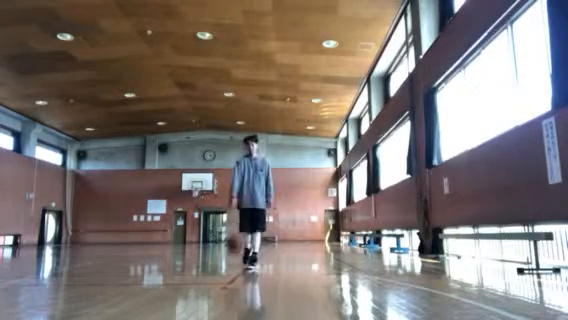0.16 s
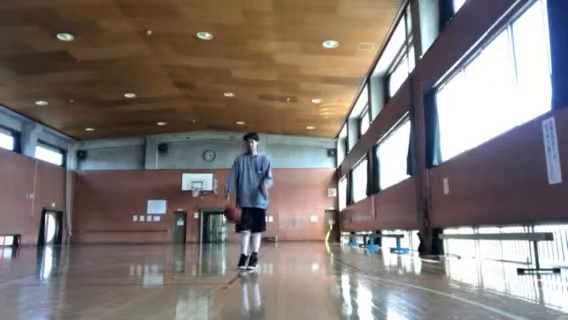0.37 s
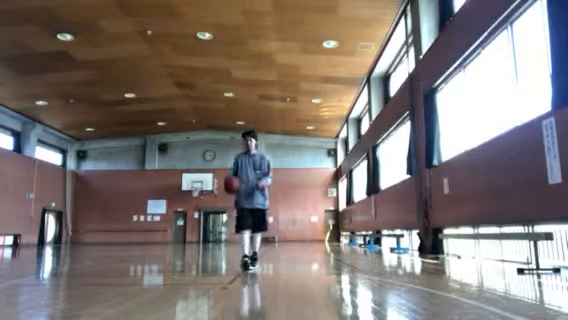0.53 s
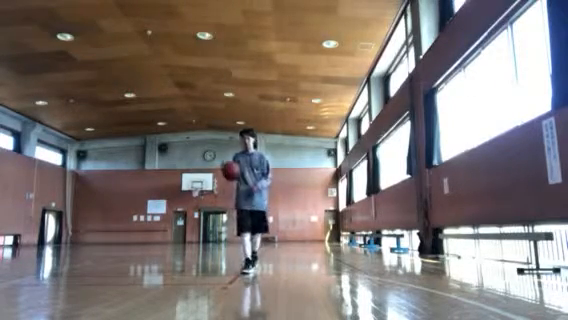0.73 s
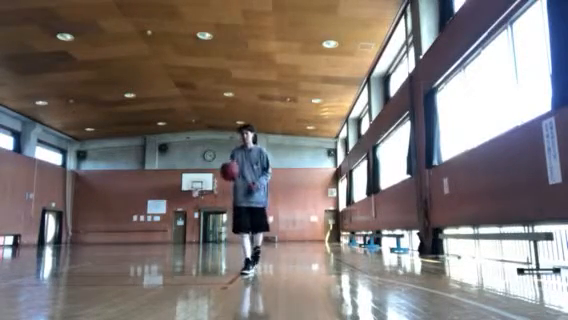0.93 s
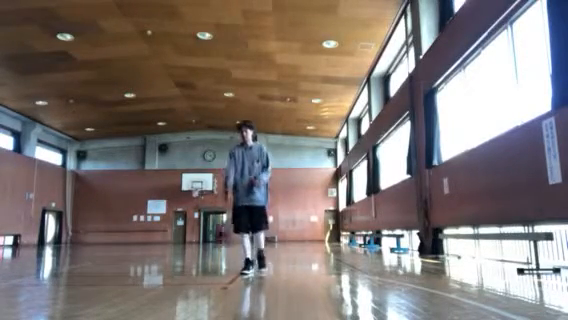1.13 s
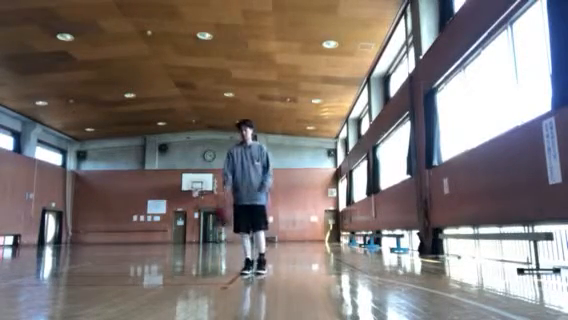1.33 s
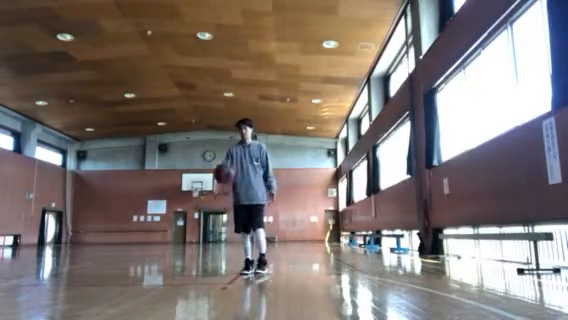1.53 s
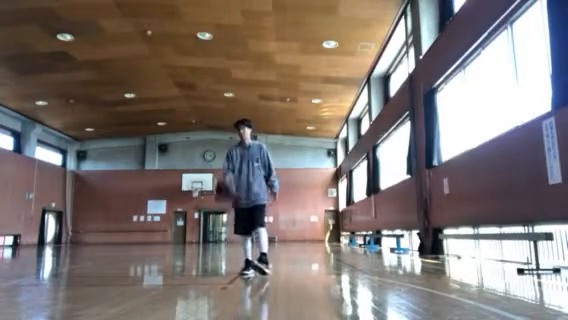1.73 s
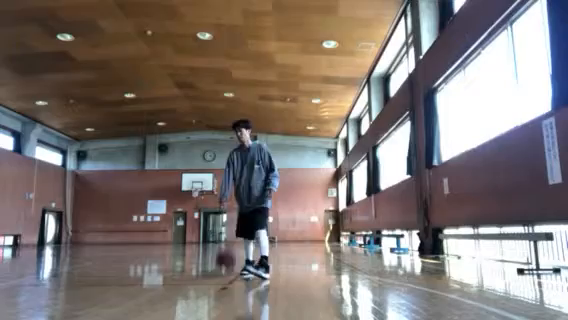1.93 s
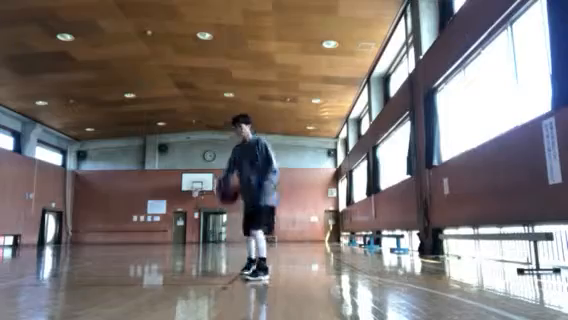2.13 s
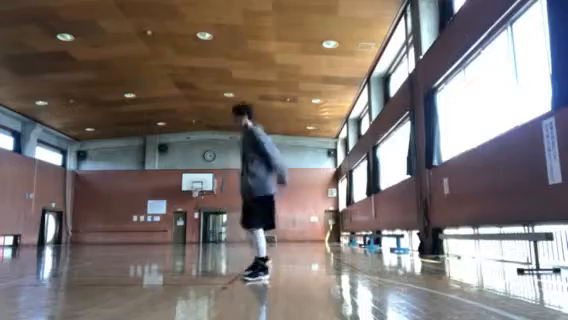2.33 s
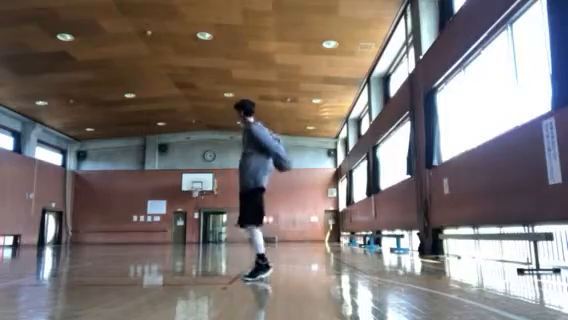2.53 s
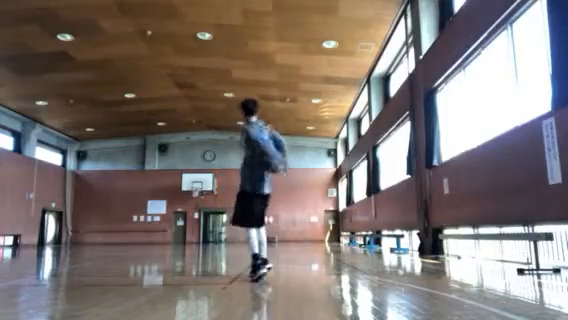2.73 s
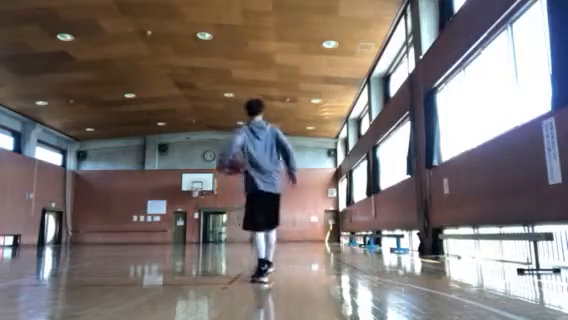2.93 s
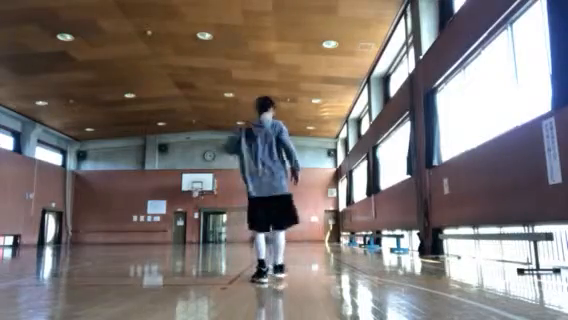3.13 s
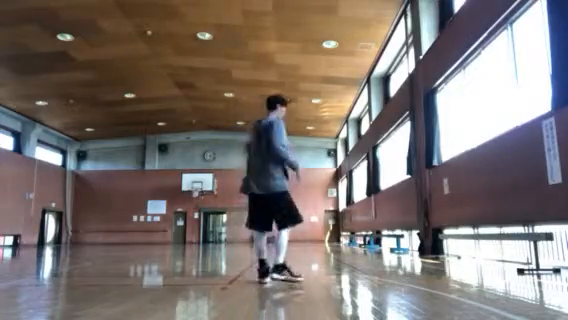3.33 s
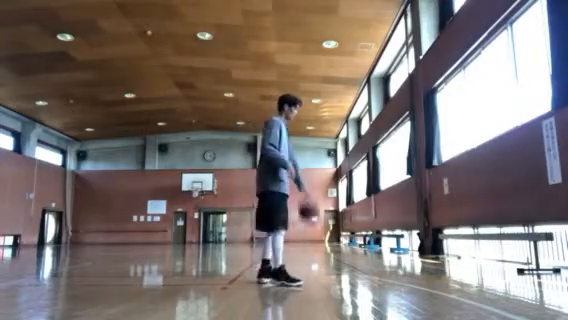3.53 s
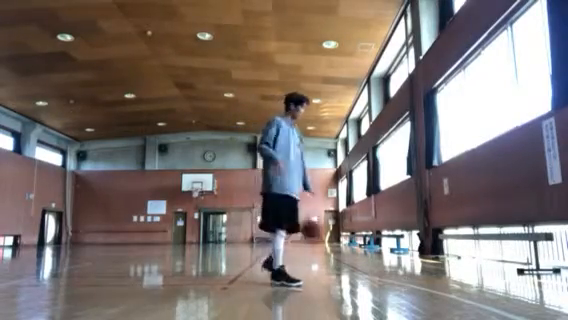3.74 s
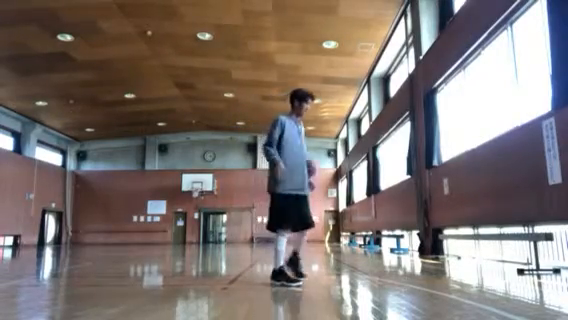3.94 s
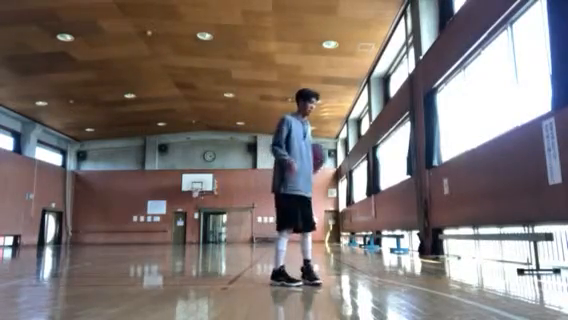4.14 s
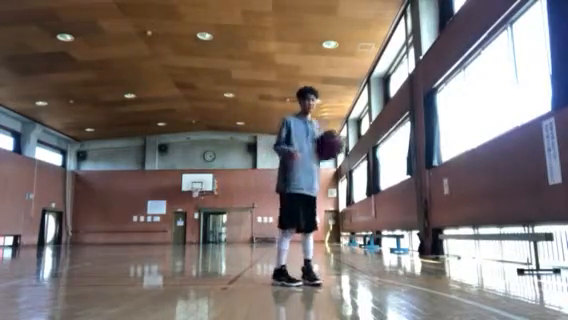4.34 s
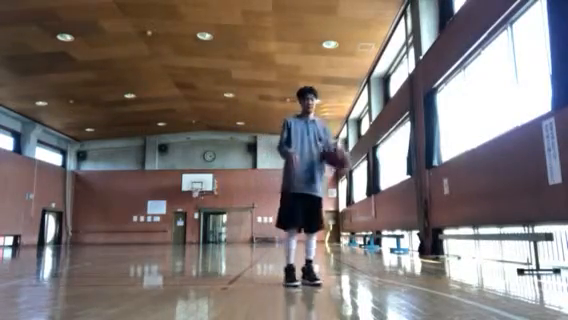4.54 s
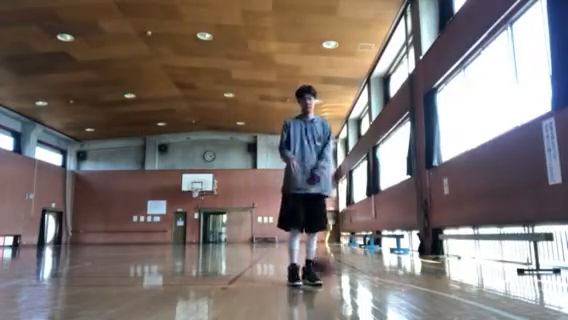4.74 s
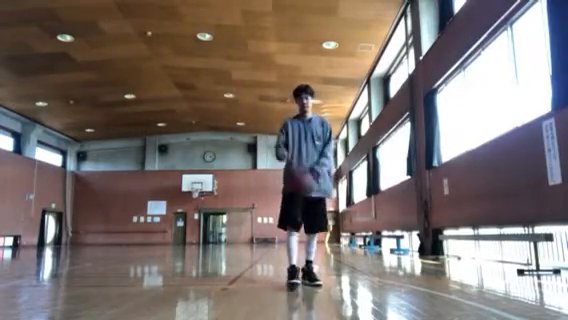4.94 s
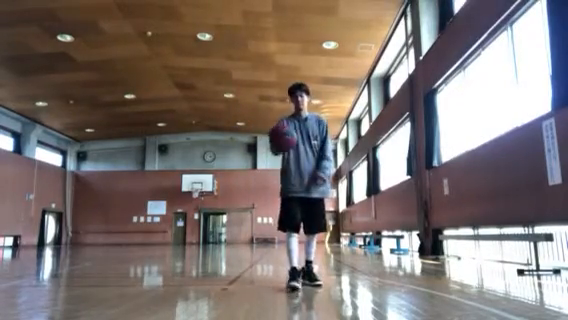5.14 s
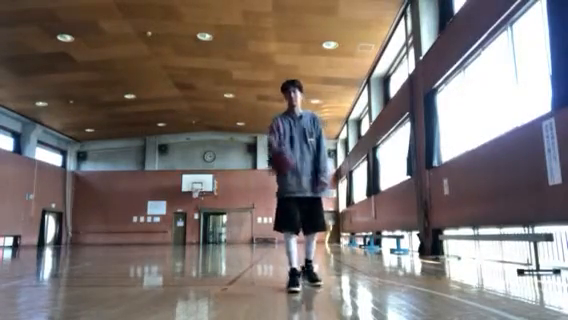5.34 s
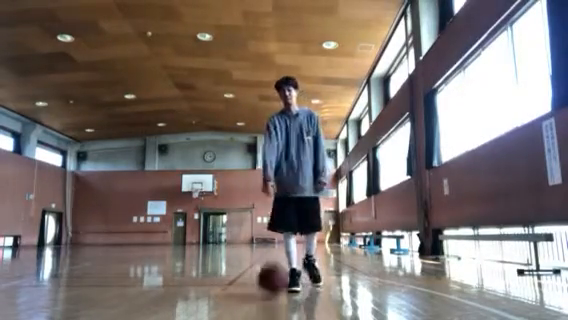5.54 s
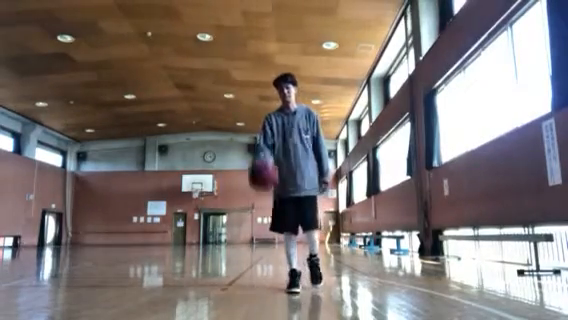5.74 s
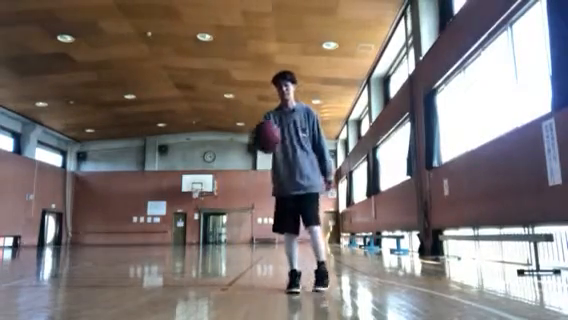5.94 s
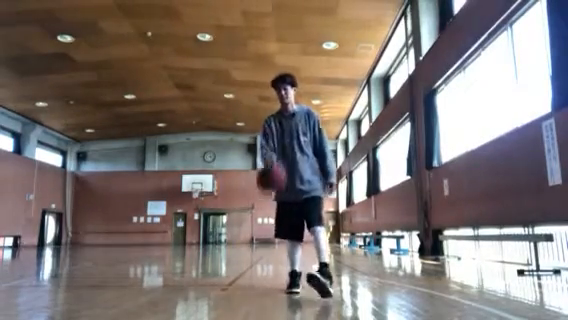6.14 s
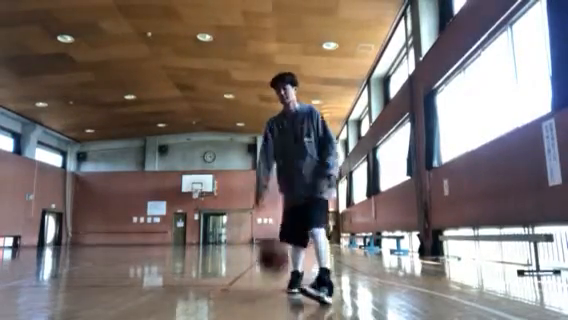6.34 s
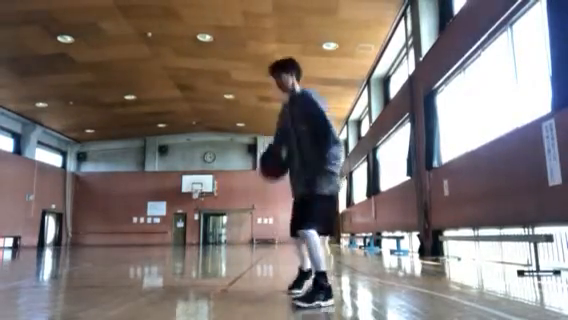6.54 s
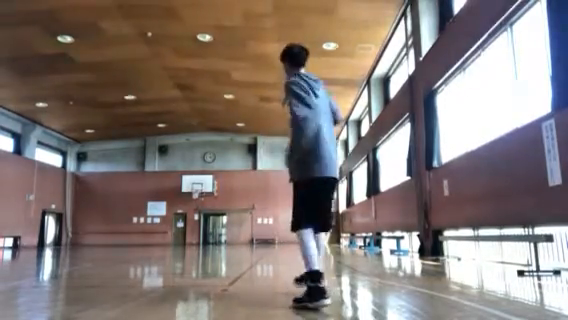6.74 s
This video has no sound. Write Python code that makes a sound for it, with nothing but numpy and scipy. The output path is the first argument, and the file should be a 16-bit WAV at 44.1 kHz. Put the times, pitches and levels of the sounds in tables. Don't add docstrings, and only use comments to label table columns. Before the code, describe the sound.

A basketball bounces seven times on a wooden floor in a large empty gym, each sharp smack booming and ringing out, with a brief shoe squeak.

```python
import sys
import numpy as np
from scipy import signal
from scipy.fft import rfft, irfft, next_fast_len
from scipy.io import wavfile
from scipy.ndimage import uniform_filter1d

SR = 44100
rng = np.random.default_rng(int(sys.argv[2]) if len(sys.argv) > 2 else 0)


def nominal_scale(level):
    x = np.asarray(level, float) / 20
    return 10 ** x


def unload_wav(signal):
    wavfile.write(
        sys.argv[1],
        SR,
        np.round(np.clip(np.atleast_2d(signal).T, -1, 1) * 32767).astype(np.int16),
    )


N = 298998
TIME = np.arange(N) / SR

# t/s, crack peak level/dB, brightness/dB, hall level/dB, floor level/dB
BOUNCES = [
    (0.353, -16, 0.5, -28.5, -30.5),
    (1.344, -15.5, -2, -30, -29),
    (2.056, -13, 8, -29, -32.5),
    (3.789, -12.5, 9, -28.5, -31),
    (4.891, -11.5, 8, -27, -27),
    (5.671, -9, 7.5, -28.5, -29.5),
    (6.433, -11.5, 7.5, -28.5, -26),
]
# t/s, hall level/dB
EARLIER_BOUNCE = (-0.26, -30)
# side wall delay/s, ceiling delay/s, bite of the skin/dB
SPOTS = [(.0104, .025, -14), (.0124, .027, -17), (.0118, .028, 11), (.0104, .0265, 20), (.0114, .040, -14),
         (.0150, .031, -6), (.0167, .0445, 12)]
# joist delay/s, joist wave over the first/dB, ring level/dB, late ring level/dB
LANDINGS = [(.021, -7, -1, -1), (0.032, -9.5, -3, -6.5), (0.026, -1, -7.5, -6), (0.022, -1, 0.3, -3),
            (.047, 0.5, 2, 6.5), (0.017, 5.5, 3, 1), (0.018, 2.5, 2.5, -5)]
# t/s, tick peak level/dB, hall level/dB, floor thud level/dB, floor ring level/dB
STEPS = [(0.066, -16, -53, -42.5, -43), (0.127, -27, -51, -60.5, -82), (0.818, -26, -70, -63, -62.5),
         (0.97, -25, -62, -74, -70), (1.505, -19, -57, -49.5, -59), (2.521, -37.5, -47, -47.5, -36.5),
         (2.832, -47.5, -68, -77, -68), (2.976, -28, -57, -69, -60), (3.073, -26.5, -60, -62, -57.5),
         (3.516, -33, -52, -58, -50), (3.711, -44, -66, -61, -59.5), (4.203, -32, -50.5, -47.5, -51),
         (6.395, -54, -55, -43.5, -51)]
# t/s, f/Hz, level/dB
SQUEAK = [
    (3.492, 2920, -72),
    (3.502, 2740, -63),
    (3.514, 2540, -56),
    (3.532, 2510, -55),
    (3.54, 2600, -55.5),
    (3.547, 2800, -57.5),
    (3.552, 2950, -70),
]
# f/Hz, width/Hz, delay/s, spread/s, level/dB
BOARD_MODES = [
    (74, 45, 0.031, 0.024, 1),
    (153, 71, 0.032, 0.015, -1),
    (296, 82, 0.015, 0.013, 1.5),
    (490, 900, 0.0061, 0.014, -2),
]
# f/Hz, width/Hz, delay/s, spread/s, level/dB
SOLE_MODES = [
    (80, 124, .03, 0.055, -14.5),
    (178.7, 25, 0.028, 0.016, -6),
    (286.5, 53, 0.0093, 0.015, -6),
    (500, 340, 0.0052, 0.004, -5.5),
]
# f/Hz, level/dB per Hz
CRACK_SPECTRUM = [(200, -19.5), (500, 0.5), (900, 2), (1400, 0.5), (1800, -3), (2600, 0), (3000, -13.5),
                  (4000, -25.5), (5500, -38), (7500, -32.5), (10000, -38.5), (13000, -45.5), (15600, -58)]
# f/Hz, level/dB per Hz
HALL_SPECTRUM = [(25, -15.5), (50, 12), (80, 9), (170, -2), (300, -15.5), (450, -9), (900, -12),
                 (1150, -15), (1900, -24), (2600, -23.5), (3500, -40.5), (4300, -50.5), (5500, -69),
                 (7500, -56), (12000, -77)]
# f/Hz, width/Hz, level/dB
BALL_MODES = [(612, 32, 7), (815, 30, 5), (945, 50, 9), (1290, 50, 3), (2530, 180, 4)]
# f/Hz, t60/s
REVERBERATION = [(40, 1.09), (110, 1.64), (280, 1.5), (740, 2.024), (1900, 2.85), (4500, 2.01), (8000, 0.9)]
# f/Hz, level/dB per Hz
HISS_SPECTRUM = [(30, -6), (100, -7), (600, 1.5), (1200, -36.5), (2600, -9), (3500, -20.5), (5500, -22),
                 (8000, -23.5), (11000, -28.5), (15800, -29)]
# f/Hz, level/dB per Hz
TICK_SPECTRUM = [(500, -38), (3000, -1), (7000, -1), (10000, -7.5), (15000, -44.5)]

# level under the crack/dB, treble/dB
WALL, CEILING, END_WALL = (-13, 1), (-17, -2), (-24, -5)
END_WALL_S = .158
FIRST_DB, JOIST_DB, EDGE_DB = (-0.9, -2, -4.5, -3), (-6.5, 2.4, -5, -11), (-11.5, -15.5, -18.5, -19.5)
EDGE_S = 0.057
LATE_S, LATE_DB = .125, (-43.5, -30, -15.5)


def unit(x):
    return x / np.sqrt(np.mean(x ** 2) + 1e-20)


def along(points, hz):
    f, value = np.transpose(points)
    return np.interp(np.log(hz + 1), np.log(f + 1), value)


def filtered(x, response):
    size = next_fast_len(N + SR // 2)
    return irfft(rfft(x, size) * response(np.fft.rfftfreq(size, 1 / SR)), size)[:N]


def resonance(f, hz, width_hz):
    damping = 1j * f * width_hz
    return damping / (hz * hz - f * f + damping)


def shelf(f, db):
    return nominal_scale(db * f * f / (f * f + 2000 ** 2))


def bite(f, db):
    return nominal_scale(db * np.abs(resonance(f, 3300, 2000)) ** 2)


def cracks(rows, sweep, rebound, smear, colour):
    size, onset_s = 4096, .0053
    out = np.zeros(N + size)
    f, t = np.fft.rfftfreq(size, 1 / SR), np.arange(size) / SR
    cepstrum = irfft(np.log(nominal_scale(along(CRACK_SPECTRUM, f))))
    cepstrum[size // 2:] = 0
    slap = np.exp(2 * rfft(cepstrum) - cepstrum[0])
    slap = slap * np.exp(-2j * np.pi * (sweep * np.log((f + 300) / 300) + f * .005))
    inner_path = np.exp(-2j * np.pi * f * .00108) / (1 + (f / 1800) ** 2)
    slap = slap / (1 - rebound * inner_path)
    for s, db, tilt_db in rows:
        direct = t == 0
        facets = rng.standard_normal(size) * nominal_scale(-60 * t / smear) * .5 + direct
        pulse = irfft(slap * colour(f, np.clip(tilt_db, -20, 20)) * rfft(facets))
        start = round((s - onset_s) * SR)
        out[start:][:size] += nominal_scale(db) * pulse / np.abs(pulse).max()
    return out[:N]


def echoes(slaps, wall_s, ceiling_s):
    s, db, bite_db = slaps.T
    rows = []
    for delay, (loss_db, treble_db) in zip((wall_s, ceiling_s, END_WALL_S), (WALL, CEILING, END_WALL)):
        rows.append(np.c_[s + delay, db + loss_db, bite_db / 4 + treble_db])
    return np.vstack(rows)


def scatter(slaps):
    when, loss, dulling = np.moveaxis(rng.random((len(slaps), 14, 3)), 2, 0)
    delay = .006 + 0.12 * when ** 1.6
    level_db = slaps[:, 1:2] - 18 - 60 * delay / 1.8 - 10 * loss
    treble_db = -6 - 6 * dulling
    return np.stack([(slaps[:, :1] + delay).ravel(), level_db.ravel(), treble_db.ravel()], axis=1)


def boards(rows, modes, linger):
    out = np.zeros(N)
    for k, (hz, width, delay, spread, db) in enumerate(modes):
        wave = unit(filtered(rng.standard_normal(N), lambda f: resonance(f, hz, width) ** 2))
        envelope = np.abs(signal.hilbert(wave, next_fast_len(N))[:N])
        wave = unit(wave / (envelope + 0.16) ** 0.25)
        arrival = max(delay - 1.88 * spread, -.5 / hz)
        for s, *levels_db in rows:
            part = slice(max(round((s - .05) * SR), 0), round((s + .7) * SR))
            u = np.clip((TIME[part] - s - arrival) / spread, 0, None)
            swell = u ** 1.104 * (np.exp(-u) + linger * np.exp(-u * 0.29))
            level_db = levels_db[min(k, len(levels_db) - 1)] + db + 14.0
            out[part] += nominal_scale(level_db) * swell * wave[part]
    return out


def floor_waves(s, db, joist_s, joist_db, ring_db):
    direct_s, joist_at = s[:, None], (s + joist_s)[:, None]
    joist_gain_db = joist_db[:, None] * [0, 1, 1, 1]
    db = db[:, None] + ring_db[:, None] * [0, 0, 1, 0]
    first = np.c_[direct_s, db + FIRST_DB]
    joist = np.c_[joist_at, db + joist_gain_db + JOIST_DB]
    edge = np.c_[joist_at + EDGE_S, db + joist_gain_db + EDGE_DB]
    return np.vstack([first, joist, edge])


def hall_colour(f):
    modes = 1 + sum((nominal_scale(db) - 1) * resonance(f, hz, width) for hz, width, db in BALL_MODES)
    return nominal_scale(along(HALL_SPECTRUM, f)) * np.abs(modes)


def hall(hits):
    hz, t, z = signal.stft(rng.standard_normal(N), SR, nperseg=512, noverlap=384)
    hz, power = hz[:, None], 0
    rise = along([(300, 0.012), (1000, 0.056), (3000, 0.11), (4500, 0.059), (8000, .012)], hz)
    t60 = along(REVERBERATION, hz)
    air_modes = np.abs(resonance(hz, 560, 200)) ** 2 + 2.3 * np.abs(resonance(hz, 1025, 200)) ** 2
    for s, db, treble_db, air_db in hits:
        age = np.clip(t - s - .007, 0, None)
        decay = nominal_scale(db - 60 * age / t60) * (1 - np.exp(-age / rise))
        power = power + (nominal_scale(air_db * air_modes) * shelf(hz, treble_db) * decay) ** 2
    clumps = uniform_filter1d(rng.standard_normal(z.shape), size=6, axis=0)
    clumps = nominal_scale(1.57 * unit(uniform_filter1d(clumps, size=5, axis=1)))
    field = signal.istft(z * clumps * np.sqrt(power), SR, nperseg=512, noverlap=384)[1][:N]
    scale = np.sqrt(np.mean(hall_colour(np.linspace(0, SR / 2, 4000)) ** 2))
    return filtered(field, hall_colour) / scale


def squeak():
    s, hz, db = np.transpose(SQUEAK)
    on = np.interp(TIME, [s[0] - .004, s[0], s[-1], s[-1] + 0.0044], [0, 1, 1, 0])
    phase = 2 * np.pi * np.cumsum(np.interp(TIME, s, hz)) / SR
    tone = on * nominal_scale(np.interp(TIME, s, db) + 1.5) * np.sin(phase)
    tone = tone * nominal_scale(4.3 * unit(uniform_filter1d(rng.standard_normal(N), size=150)))
    age = TIME[:2 * SR]
    tail = rng.standard_normal(2 * SR) * nominal_scale(-60 * age / 3.5) * (1 - np.exp(-age / .05))
    held = filtered(tone, lambda f: resonance(f, 2520, 90))
    hang = signal.fftconvolve(held, tail / np.linalg.norm(tail))[:N]
    beat = np.abs(signal.hilbert(hang, next_fast_len(N))[:N])
    even = uniform_filter1d(beat, size=4400) + 1e-9
    return tone + nominal_scale(6) * hang * (even / (beat + .2 * even)) ** .45


def circuit_noise():
    hiss = unit(filtered(rng.standard_normal(N), lambda f: nominal_scale(along(HISS_SPECTRUM, f))))
    whine = unit(filtered(rng.standard_normal(N), lambda f: resonance(f, 5039, 25)))
    return nominal_scale(-67.0) * hiss + nominal_scale(-89) * whine


def electric_ticks():
    age = (TIME - .0385) % .05
    burst = rng.standard_normal(N) * nominal_scale(-60 * age / 0.017)
    return nominal_scale(-83.5) * unit(filtered(burst, lambda f: nominal_scale(along(TICK_SPECTRUM, f))))


def scene():
    s, crack_db, bright_db, hall_db, floor_db = np.transpose(BOUNCES)
    wall_s, ceiling_s, bite_db = np.transpose(SPOTS)
    joist_s, joist_db, lean_db, late_db = np.transpose(LANDINGS)
    step_s, tick_db, step_hall_db, thud_db, ring_db = np.transpose(STEPS)
    flat = 0 * step_s

    slaps = np.c_[s, crack_db, bite_db]
    air = cracks(slaps, sweep=1.1, rebound=.68, smear=.002, colour=bite)
    inside = np.c_[s + .0029, crack_db - 7, bite_db / 4 - 12]
    air = air + cracks(inside, sweep=.8, rebound=.6, smear=.004, colour=shelf)
    reflected = np.vstack([echoes(slaps, wall_s, ceiling_s), scatter(slaps)])
    air = air + cracks(reflected, sweep=.6, rebound=.35, smear=.008, colour=shelf)
    ticks = np.c_[step_s, tick_db, flat - 9]
    air = air + nominal_scale(-16.5) * cracks(ticks, sweep=2.6, rebound=0.13, smear=0.0035, colour=shelf)

    floor = boards(floor_waves(s, floor_db, joist_s, joist_db, lean_db), BOARD_MODES, linger=0.013)
    late = np.c_[s + LATE_S, (floor_db + late_db)[:, None] + LATE_DB]
    footfalls = np.c_[step_s, thud_db - 9, thud_db, ring_db]
    floor = floor + boards([*footfalls, *late], SOLE_MODES, linger=0.064)
    floor = filtered(floor, lambda f: 1 / (1 + (f / 1270) ** 4))

    bounces = np.c_[s, hall_db, bright_db, -.4 * bright_db]
    steps = np.c_[step_s, step_hall_db, flat, flat]
    diffuse = hall([(*EARLIER_BOUNCE, 0, 0), *bounces, *steps])
    return (air + floor + diffuse + squeak())[None]


def roll_off(x):
    return signal.sosfilt(signal.butter(12, 15800, fs=SR, output="sos"), x)


def record(dry):
    sound = filtered(dry[0], lambda f: (1j * f / (36 + 1j * f)) ** 4)
    mix = (sound + circuit_noise() + electric_ticks())[None]
    return roll_off(mix)


dry = scene()
out = record(dry)
unload_wav(out)
```